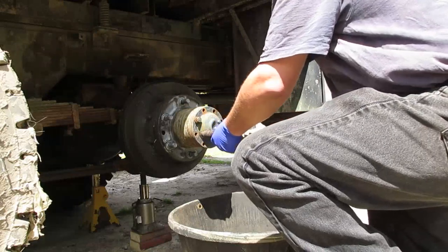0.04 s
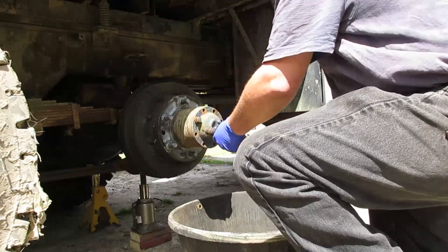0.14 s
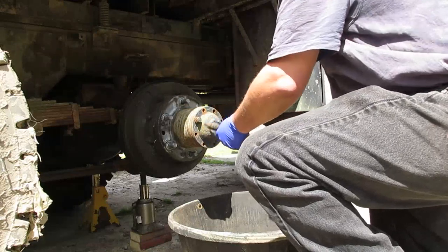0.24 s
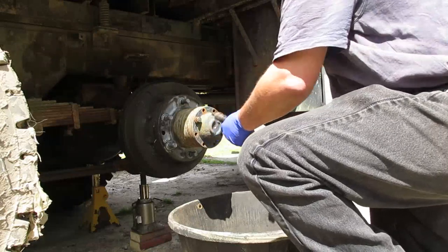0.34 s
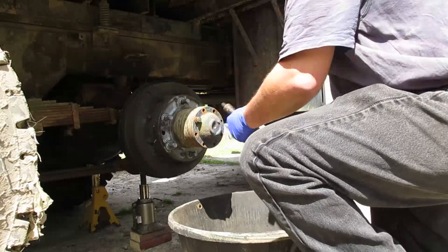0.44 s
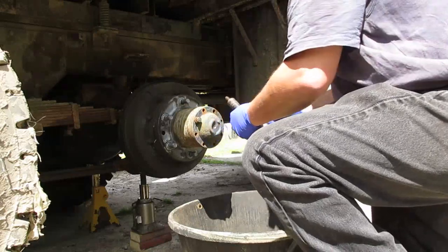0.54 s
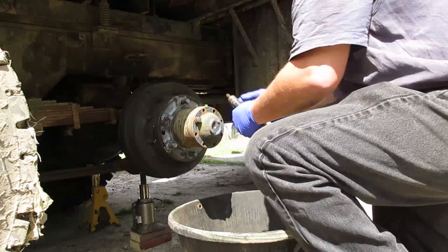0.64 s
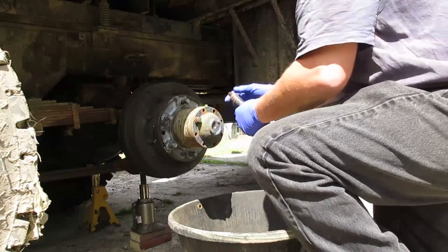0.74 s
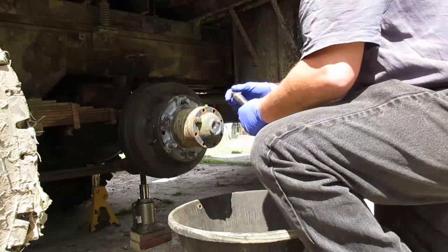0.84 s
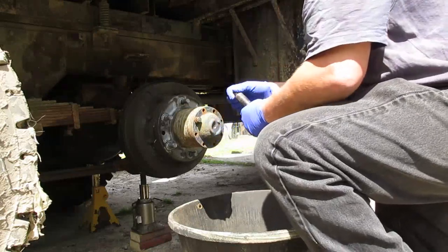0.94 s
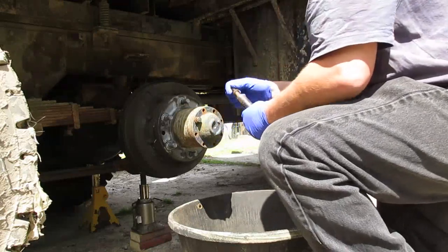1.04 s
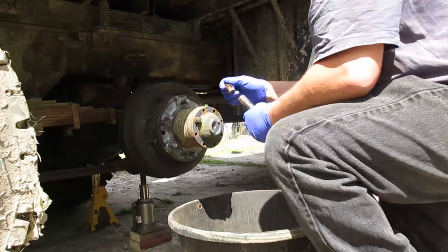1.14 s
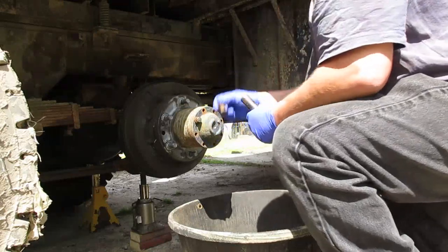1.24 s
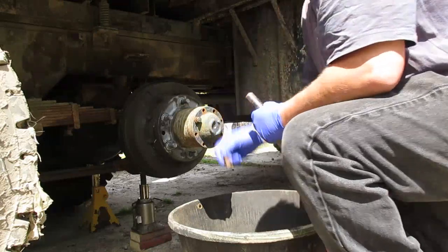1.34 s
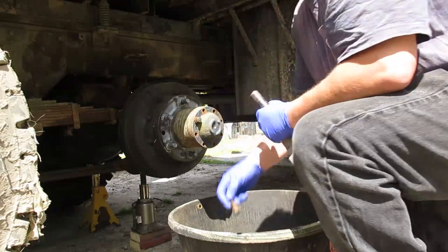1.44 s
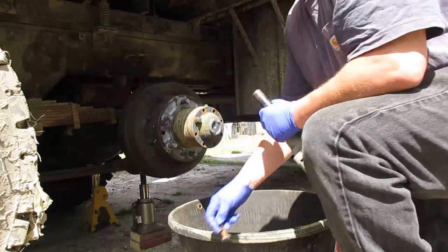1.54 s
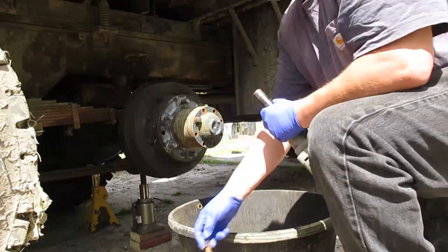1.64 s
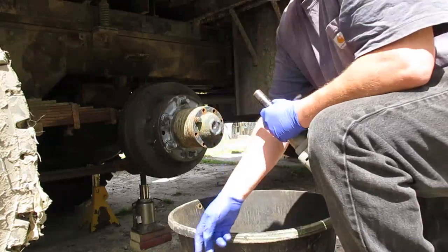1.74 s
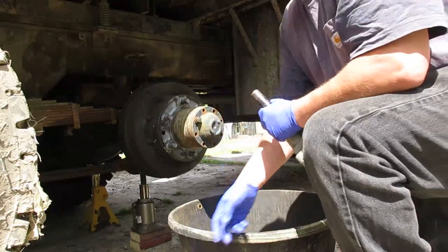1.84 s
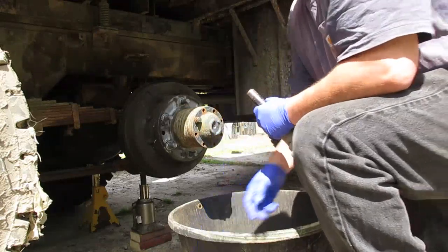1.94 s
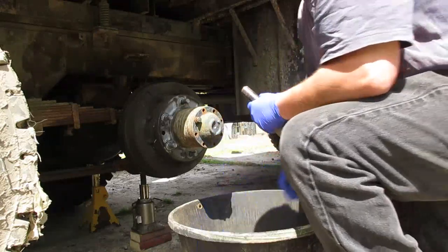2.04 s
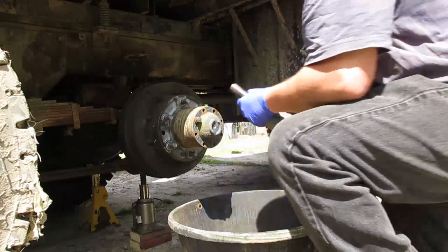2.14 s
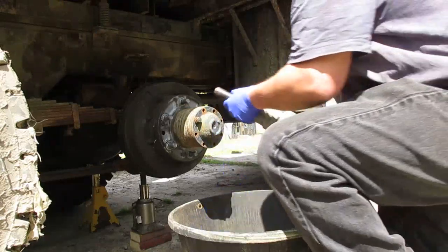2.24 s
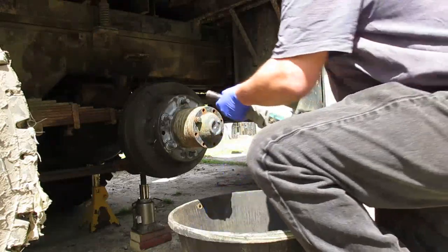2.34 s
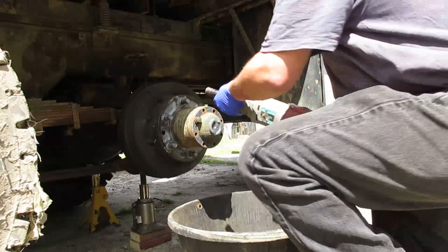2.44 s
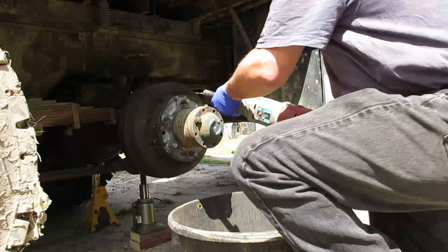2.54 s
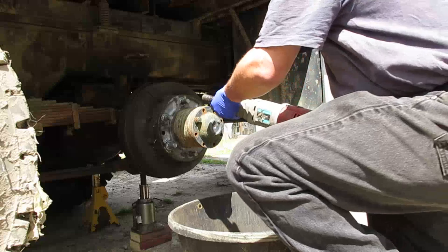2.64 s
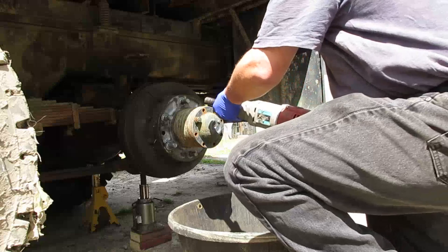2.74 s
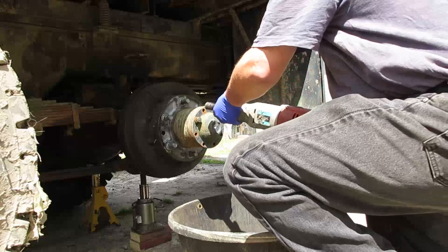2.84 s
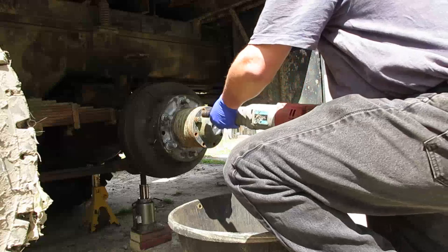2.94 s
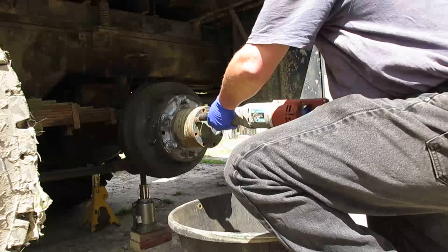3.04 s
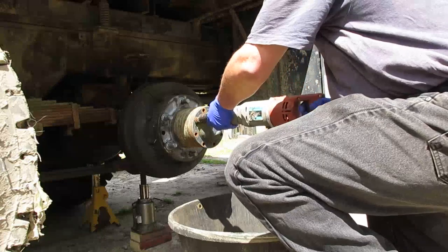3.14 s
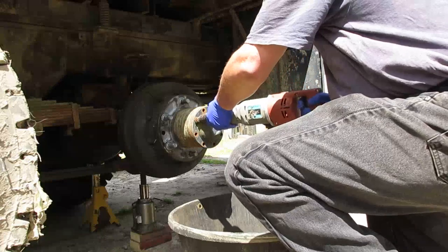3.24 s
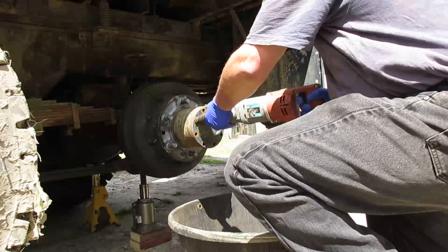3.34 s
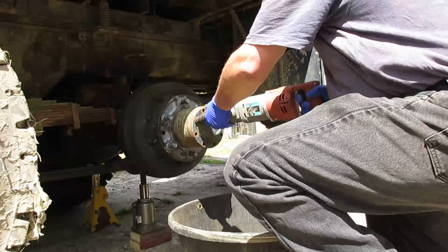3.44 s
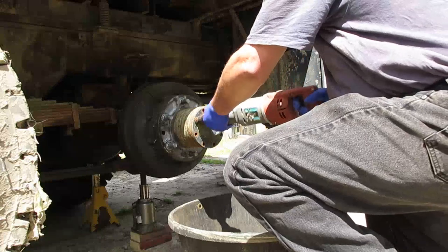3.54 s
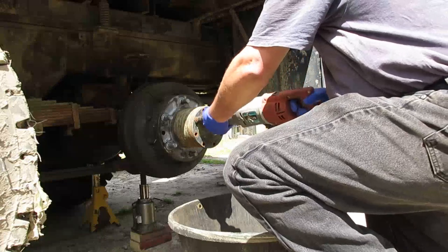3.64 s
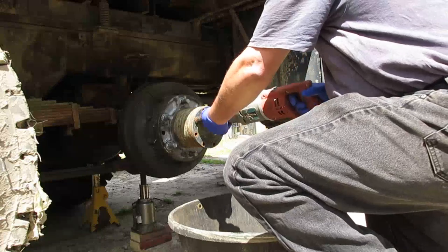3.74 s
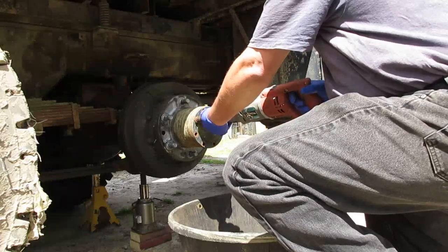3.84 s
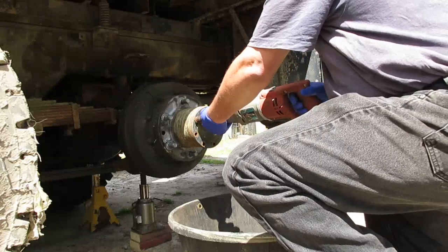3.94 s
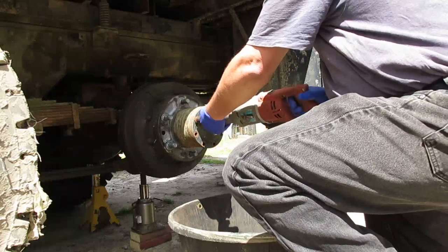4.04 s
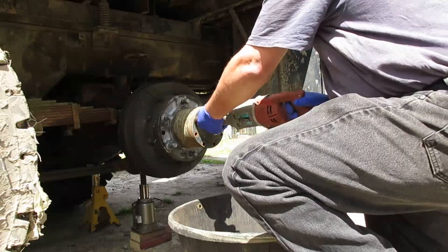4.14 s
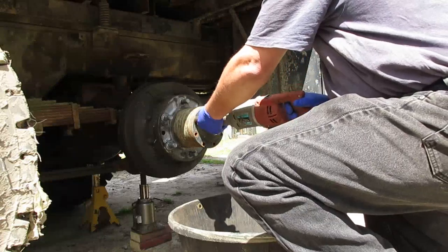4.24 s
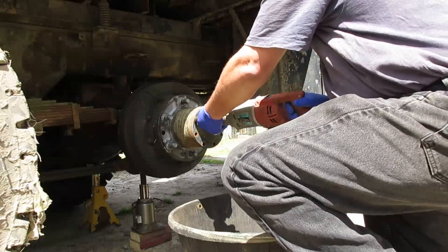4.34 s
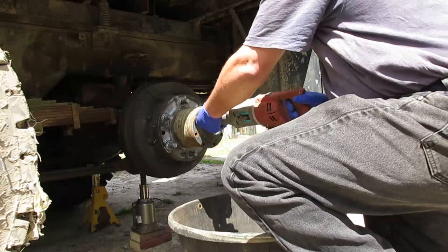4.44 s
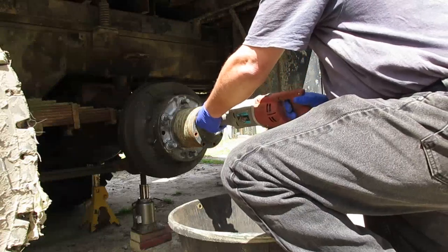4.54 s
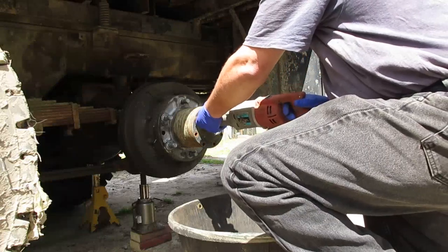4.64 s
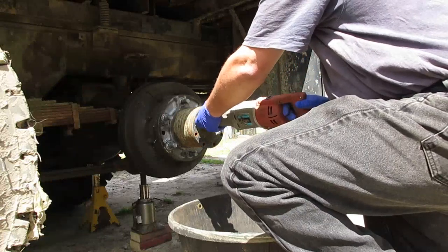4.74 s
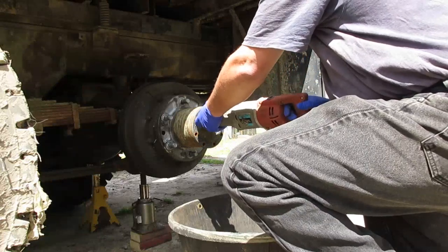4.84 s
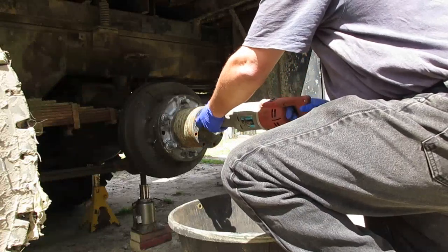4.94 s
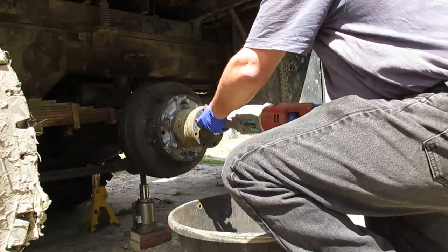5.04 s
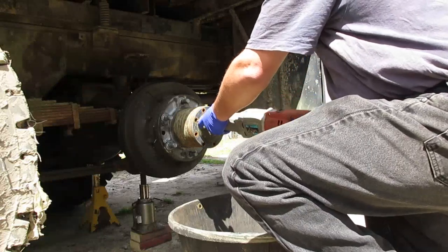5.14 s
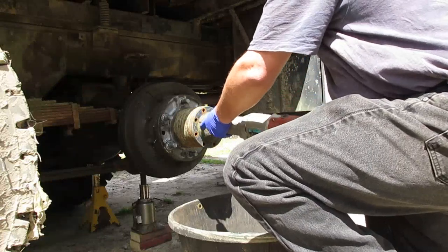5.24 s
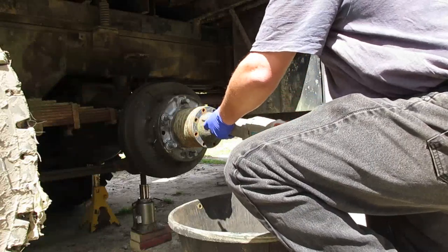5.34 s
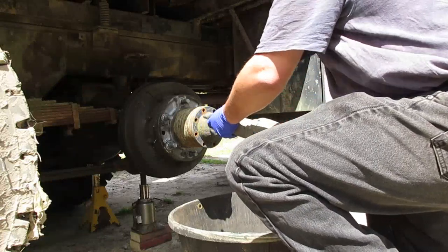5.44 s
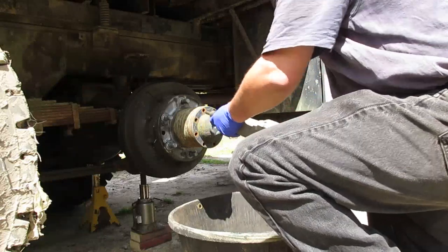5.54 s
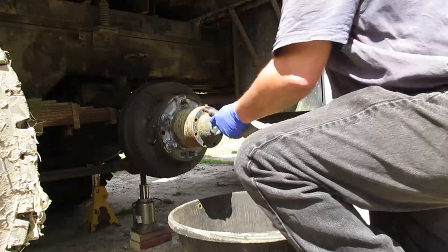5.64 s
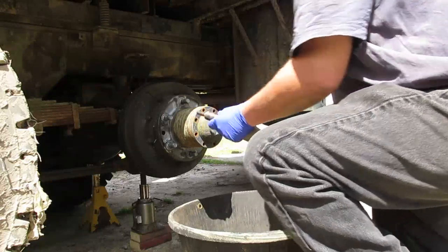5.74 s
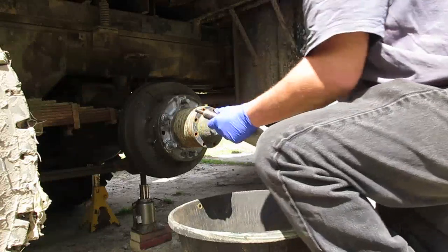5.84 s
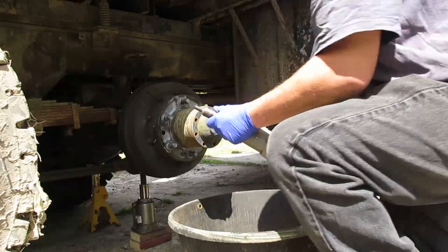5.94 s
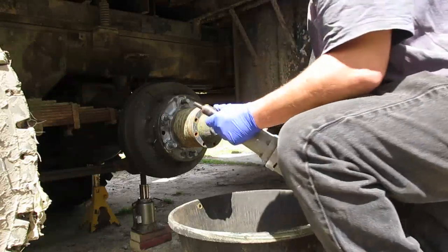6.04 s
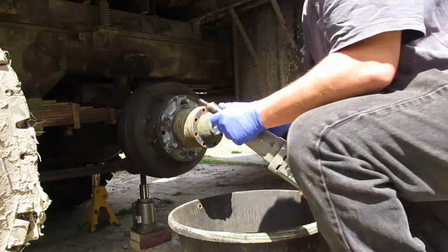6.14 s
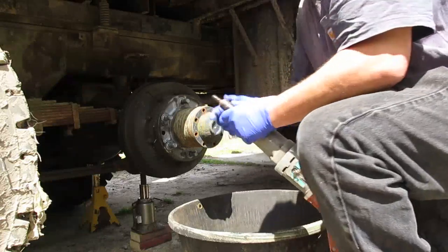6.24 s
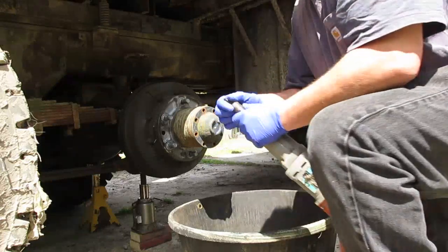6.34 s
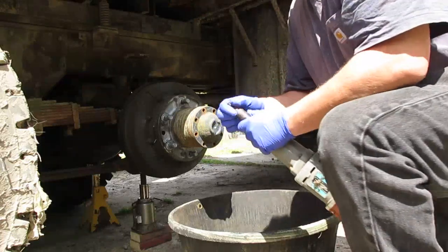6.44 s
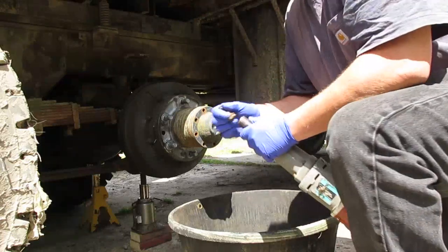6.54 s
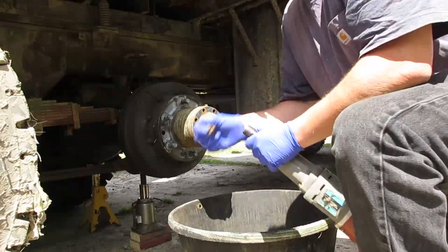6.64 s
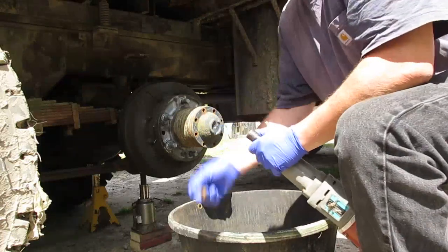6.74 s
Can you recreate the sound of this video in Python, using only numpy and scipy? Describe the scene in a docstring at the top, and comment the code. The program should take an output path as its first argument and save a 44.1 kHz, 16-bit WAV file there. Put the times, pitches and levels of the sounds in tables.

```python
"""Impact wrench at a truck hub

An electric impact wrench under an open shed coasts down, later spins up and coasts again: gear teeth
rattle the case, mesh tones glide through its resonances. Around the bursts the socket knocks on studs,
a nut drops and clinks, clothes rustle. Birds call outside; light wind stirs over the hum of the yard."""
import sys
import numpy as np
from scipy import signal
from scipy.io import wavfile
from scipy.ndimage import uniform_filter1d

SR = 44100
rng = np.random.default_rng(int(sys.argv[2]) if len(sys.argv) > 2 else 0)


def digitize_waveform(pressure):
    """Quantize a signal to 16-bit integers and store it at the path in sys.argv[1].

    Rows of a 2-D input are taken as channels; values are limited to [-1, 1].
    """
    field = np.atleast_2d(pressure).T
    bounded = np.clip(field, -1, 1)
    quanta = np.round(bounded * 32767).astype(np.int16)
    wavfile.write(sys.argv[1], SR, quanta)


N = 298998
T = np.arange(N) / SR

# background envelopes: (time [s], yard hum [dB], wind [dB])
BACKGROUND = [(0, -56, -66), (1.0, -59, -58), (2.0, -55, -53.5), (2.4, -52.5, -49), (4.3, -49.5, -45.5),
              (4.6, -54, -55), (5.6, -50, -54.5), (5.8, -49, -47), (6.55, -51, -44), (6.78, -46, -45)]


def amp(db):
    return 10 ** (np.asarray(db) / 20)


def unit_rms(x):
    return x / np.sqrt(np.mean(x ** 2) + 1e-20)


def colour(x, points):
    """Causal filter following (frequency [Hz], gain [dB]) points."""
    f, db = np.transpose(points)
    hz = abs(np.fft.fftfreq(8192, 1 / SR))
    log_gain = np.log(amp(np.interp(np.log(hz + 1), np.log(f + 1), db)))
    taps = np.fft.ifft(np.exp(np.conj(signal.hilbert(log_gain)))).real[:4096]
    return signal.oaconvolve(x, taps)[:len(x)]


def band(x, lo_hz, hi_hz):
    sos = signal.butter(2, [lo_hz, min(hi_hz, .45 * SR)], "band", fs=SR, output="sos")
    return signal.sosfilt(sos, x)


def lift(x, db, lo_hz, hi_hz):
    """Zero-phase boost or cut of one band."""
    return x + (amp(db) - 1) * band(band(x, lo_hz, hi_hz)[::-1], lo_hz, hi_hz)[::-1]


def ring(x, hz, width_hz):
    """Resonance with steep skirts, rms 1."""
    pole = np.exp((2j * hz - width_hz) * np.pi / SR)
    return unit_rms(signal.lfilter([1], np.convolve([1, -pole], [1, -pole]), x).real)


def drift(n, rate_hz):
    """Smooth random curve, rms 1."""
    span = max(int(SR / rate_hz / 2), 2)
    return unit_rms(uniform_filter1d(uniform_filter1d(rng.standard_normal(n), span), span))


def add(mix, start_s, sound):
    part = mix[round(start_s * SR):][:len(sound)]
    part += sound[:len(part)]


def echoes(x, t60_s):
    """Sparse decaying reflections of random sign."""
    at = np.arange(200, SR, 20)
    taps = np.zeros(SR + 20)
    taps[at + rng.integers(0, 20, len(at))] = rng.choice([-1., 1.], len(at)) * amp(-60 * at / SR / t60_s)
    return signal.oaconvolve(band(x, 160, 8500), taps / np.linalg.norm(taps))[:N]


def yard_hum():
    """Low, slightly wavering noise of the yard."""
    # hum spectrum: (frequency [Hz], gain [dB])
    spectrum = [(88, -31.5), (150, -5), (334, -10), (439, -13.5), (624, -7), (1260, -8.5), (1360, -6),
                (1940, -12.5), (2360, -16), (10200, -30), (14500, -44), (16000, -61)]
    times_s, hum_db, _ = np.transpose(BACKGROUND)
    hum = colour(rng.standard_normal(N), spectrum)
    return hum * amp(np.interp(T, times_s, hum_db) + .8 * drift(N, 12)) / np.std(band(hum, 600, 2000))


def wind():
    """Lumpy rumble of light wind."""
    # wind spectrum: (frequency [Hz], gain [dB])
    spectrum = [(12, -53), (20, -20), (81, 2.5), (118, -3.5), (166, -1.5), (300, -7), (382, -11.5),
                (500, -8.5), (650, -44), (1100, -120)]
    times_s, _, wind_db = np.transpose(BACKGROUND)
    rumble = unit_rms(colour(rng.standard_normal(N), spectrum))
    return rumble * amp(np.interp(T, times_s, wind_db) - 2.5 + 2.36 * drift(N, 23))


def cloth():
    """Grainy rustle swelling above a faint floor."""
    # rustle spectrum: (frequency [Hz], gain [dB])
    spectrum = [(1500, -48), (3000, 4), (5000, -3), (9000, -5.5), (12000, -12), (15500, -14.5)]
    # cloth swells: (centre [s], half-width [s], level [dB])
    swells = [(2.3, 0.17, -58.5), (2.85, .07, -57), (6.3, 0.33, -58), (6.43, 0.027, -56), (6.78, .14, -50)]
    envelope = amp(-64) + sum(amp(db - 8.1 * ((T - at_s) / half_s) ** 2) for at_s, half_s, db in swells)
    grains = rng.standard_normal(N) * amp(1.4 * drift(N, 17) + 3.2 * drift(N, 400))
    return unit_rms(colour(grains, spectrum)) * envelope


def glide(start_s, length_s, first_hz, last_hz, db, bend):
    """Bird note contour: slide, then hold, under a level arch. Bend > 1 slides late."""
    progress = np.arange(0, length_s, 1 / SR) / length_s
    slide = np.minimum(progress / .82, 1) ** bend
    return start_s, (first_hz + (last_hz - first_hz) * slide, db - 7 * (2 * progress - 1) ** 2)


def contour(rows):
    """Start time and per-sample columns of a breakpoint table."""
    times_s, *columns = np.transpose(rows)
    t = np.arange(times_s[0], times_s[-1], 1 / SR)
    return times_s[0], [np.interp(t, times_s, column) for column in columns]


def birds():
    """Wavering whistles, chirps fluttered into a rasp, a nasal call of five partials."""
    # whistles: (start [s], length [s], nominal first pitch [Hz], nominal last pitch [Hz], level [dB])
    whistles = [(1.089, 0.27, 2020, 3170, -55.5), (1.39, 0.12, 1950, 1900, -59),
                (1.63, 0.096, 1930, 1950, -57), (1.729, 0.24, 2006, 3130, -54),
                (2.05, .09, 1950, 1900, -56)]
    # raspy notes: (start [s], length [s], first pitch [Hz], last pitch [Hz], level [dB])
    chirps = [(1.0, .08, 2580, 4000, -61), (2.98, 0.093, 3500, 3280, -57.5), (3.56, .11, 3190, 4040, -52),
              (3.6, .1, 2890, 2850, -54), (3.88, .12, 2810, 2920, -48), (3.92, 0.12, 2426, 2400, -43.5),
              (4.08, .11, 3070, 4300, -51), (4.13, 0.13, 3600, 3350, -44.5),
              (6.05, 0.09, 2096, 2220, -45.5)]
    # long call and its lower ending, one list each: (time [s], pitch [Hz], level [dB])
    calls = [
        [(5.9, 1350, -46), (5.99, 1374, -38.5), (6.09, 1348, -48), (6.19, 1400, -38.5), (6.29, 1388, -37.5),
         (6.38, 1316, -38)],
        [(6.36, 1071, -43), (6.45, 952, -49)],
    ]
    # call harmonics: (multiple of pitch, level [dB])
    harmonics = [(1, -10), (2, 0), (3, -12), (4, -15), (5, -24)]
    notes = [(glide(*row, bend=2.1), [(.98, 0)], .014, 120) for row in whistles]  # one pure tone
    notes += [(glide(*row, bend=.55), [(1, 0)], .04, 300) for row in chirps]
    notes += [(contour(rows), harmonics, .006, 80) for rows in calls]
    out = np.zeros(N)
    for (start_s, (hz, level_db)), partials, waver, flutter_hz in notes:
        n = len(hz)
        phase = 2 * np.pi * np.cumsum(hz * (1 + waver * drift(n, flutter_hz))) / SR
        note = sum(amp(db + 3.2 * drift(n, flutter_hz)) * np.sin(k * phase) for k, db in partials)
        add(out, start_s, amp(level_db) * note * signal.windows.tukey(n, .2))
    return out


def struck(modes, blows):
    """Each blow rings the modes of one steel part."""
    out, t = np.zeros(N), np.arange(SR // 3) / SR
    for at_s, *levels_db in blows:
        for db, (hz, t60_s) in zip(levels_db, modes):
            add(out, at_s, amp(db - 60 * t / t60_s) * np.sin(2 * np.pi * hz * t))
    return out


def clinks():
    """The dropped nut and the socket ring."""
    # nut modes, the close pair beats: (frequency [Hz], t60 [s])
    nut_modes = [(11950, 0.12), (14800, .1), (11975, 0.099)]
    # nut impacts: (time [s], level of each mode [dB])
    nut_blows = [(1.881, -50, -27, -50), (1.911, -26.5, -34, -41)]
    # socket modes: (frequency [Hz], t60 [s])
    socket_modes = [(5405, 0.1), (5798, 0.11), (12510, 0.068), (14370, 0.076)]
    # socket impacts: (time [s], level of each mode [dB])
    socket_blows = [(6.446, -48, -50, -70, -52), (6.557, -44, -45, -45, -38), (6.569, -58, -63.5, -54, -32)]
    return struck(nut_modes, nut_blows) + struck(socket_modes, socket_blows)


def knock(db, treble_db):
    """Steel on steel: a crack and a noisy ring. Harder knocks start and die faster."""
    # impact spectrum: (frequency [Hz], gain [dB])
    spectrum = [(300, 2), (1500, 6.5), (3300, 9.5), (6000, 5.5), (11000, -4.5), (15500, -11)]
    t = np.arange(SR // 5) / SR
    noise = rng.standard_normal(len(t))
    steel = unit_rms(unit_rms(colour(noise, spectrum)) + .33 * ring(noise, hz=3030, width_hz=1300))
    rise_s = .0004 * amp(-.7 * (db + 10))
    crack_t60_s, ring_t60_s = .0064, .083 * amp(-.25 * (db + 21))
    decay = amp(-60 * t / crack_t60_s) + .64 * amp(-60 * t / ring_t60_s)
    return amp(db - 12) * lift(steel, treble_db, 3600, 21000) * (1 - np.exp(-t / rise_s)) * decay


def handling():
    """Socket knocks on the studs; dull thuds of falling pitch."""
    # steel knocks: (time [s], strength [dB], treble lift [dB])
    knocks = [(1.707, -34.5, 5), (1.8807, -7.5, 6.5), (1.908, -9, -0.5), (1.916, -17.5, 5),
              (2.1713, -36, 9), (2.2994, -20.5, -8), (2.513, -29.5, -5), (2.61, -26.5, -4),
              (2.6297, -30.5, 5), (2.668, -27.5, 6), (2.7703, -34, 6.5), (3.1078, -31, -3),
              (3.2243, -12, -11), (3.3064, -24, -15), (3.333, -20.5, -18), (3.357, -7.5, -21.5),
              (3.6531, -19, 1), (3.778, -25, -16), (3.82, -20.5, -9), (3.925, -30, 5), (4.1631, -24, 8),
              (4.1857, -6.5, -9.5), (4.2961, -35, 4), (6.419, -23.5, -2), (6.4344, -25, -7),
              (6.555, -33, 0), (6.6376, -27, -4)]
    # thuds: (time [s], level [dB], initial pitch [Hz])
    thuds = [(1.882, -28.5, 297), (2.441, -24, 262), (3.008, -35, 163), (3.223, -30, 154),
             (3.355, -27, 210), (4.191, -22, 169), (6.434, -32, 680)]
    thud_rise_s, thud_t60_s = .0026, .067
    out, t = np.zeros(N), np.arange(SR // 4) / SR
    for at_s, db, treble_db in knocks:
        add(out, at_s, knock(db, treble_db))
    for at_s, db, hz in thuds:
        envelope = amp(db - 60 * t / thud_t60_s) * (1 - np.exp(-t / thud_rise_s))
        add(out, at_s, envelope * np.sin(2 * np.pi * hz * t * (1 - 2 * t)))
    return out


def motor(on_s, release_s, stop_s, base_db, run_out_s, lift_db):
    """Spin-up, then coasting against drag and friction: sets mesh rate, clatter level and treble."""
    free_hz, spin_up_s, drag_per_s, friction_hz = 1525, .114, .73, 400
    slack_s, bite_s, tail_s = .015, .018, .066
    t = np.arange(max(on_s + slack_s, 0), stop_s + tail_s, 1 / SR)
    powered_s, coasted_s = np.minimum(t, release_s) - on_s, np.maximum(t - release_s, 0)
    meshed_s, left_s = t - on_s - slack_s, np.maximum(stop_s - t, 0)
    load = np.exp(-powered_s / spin_up_s)
    mesh_hz = (free_hz * (1 - load) + friction_hz) * np.exp(-drag_per_s * coasted_s) - friction_hz
    pull_db = (2.5 + 8.5 * load) * np.exp(-coasted_s / .0046)  # louder under power, most while slow
    coast_db = 1.89 * np.log2(mesh_hz / 1000) * (coasted_s > 0)
    onset_db = -20 * np.exp(-meshed_s / bite_s)
    ending_db = -14 * np.exp(-left_s / run_out_s) - 35 * np.maximum(t - stop_s, 0) / tail_s
    treble_db = lift_db - 7.5 * np.exp(-meshed_s / .11) - 18 * np.exp(-left_s / .17)  # dull at both ends
    return t[0], mesh_hz, base_db + pull_db + coast_db + onset_db + ending_db, treble_db


def gear_clatter(mesh_hz, treble_db, boom_db):
    """Teeth rattle in their slack and ring the case, small parts and the loose socket."""
    # clatter spectrum: (frequency [Hz], gain [dB])
    spectrum = [(200, -59.5), (450, -19), (700, -17), (1100, -5), (1700, -7), (2600, 0), (4500, -1.5),
                (6500, -4.5), (9000, -6), (11500, -13.5), (12500, -18.5), (15500, -26.5)]
    # case modes: (frequency [Hz], width [Hz], level [dB])
    case_modes = [(903, 215, -2), (1315, 47, -13.5), (1948, 50, -19), (2820, 390, -3.5), (3140, 390, -5),
                  (5620, 700, -10), (6110, 770, -4), (7550, 1100, -8.5), (8530, 140, -12)]
    # housing modes that wake at low speed: (frequency [Hz], width [Hz], level at 400 teeth/s [dB])
    groan_modes = [(658.3, 41, -15.5), (1010, 64, -20)]
    # loose socket resonance: (frequency [Hz], width [Hz], level [dB])
    socket_mode = (6650, 330, -9)
    n = len(mesh_hz)
    hits = rng.random(n) < 1.5 * mesh_hz / SR
    taps = hits * amp(3.1 * np.minimum(rng.exponential(1, n), 4)) * rng.choice([-1, 1], n)
    drive = unit_rms(unit_rms(taps) + 1.84 * rng.standard_normal(n)) * amp(1.05 * drift(n, 64))

    def mode(hz, width_hz, db, waver_db, rate_hz):
        return amp(db + waver_db * drift(n, rate_hz)) * ring(drive, hz, width_hz)

    case = sum(mode(*row, waver_db=2.5, rate_hz=25) for row in case_modes)
    parts = unit_rms(sum(mode(hz, 190, 0, waver_db=5, rate_hz=12) for hz in rng.uniform(1800, 11000, 60)))
    slow_db = 16.7 * np.log2(400 / np.maximum(mesh_hz, 260))
    groan = amp(slow_db) * sum(mode(*row, waver_db=1.8, rate_hz=15) for row in groan_modes)
    socket = amp(3.34 * treble_db) * mode(*socket_mode, waver_db=2, rate_hz=23)
    rattle = unit_rms(colour(drive + .28 * parts, spectrum)) + .3 * case
    rattle /= np.std(band(rattle, 1800, 5000))
    rattle = lift(rattle, boom_db, 200, 1700)
    return lift(rattle, treble_db, 5300, 19000) + groan + socket


def gear_whine(mesh_hz, mesh_phase):
    """Mesh tones glide through housing resonances; teeth strike harder at speed and under power."""
    # housing radiation: (frequency [Hz], gain [dB])
    radiation = [(380, -58), (470, -38), (700, -34), (900, -21), (1060, -34), (1180, -37), (1290, -23),
                 (1450, -31), (1750, -30), (2100, -35), (2600, -25), (3500, -45)]
    # mesh tones: (multiple of mesh rate, level [dB])
    orders = [(1, 0), (1.34, -11), (2, -3)]
    n = len(mesh_hz)
    pulling = uniform_filter1d(1. * (np.gradient(mesh_hz) > 0), 2000)
    force_db = 8 * np.log2(mesh_hz / 1000) + 1.2 * pulling
    housing_hz, housing_db = np.transpose(radiation)
    tones = np.zeros(n)
    for k, order_db in orders:
        radiated_db = np.interp(np.log(k * mesh_hz), np.log(housing_hz), housing_db)
        tones += amp(order_db + radiated_db + 3.5 * drift(n, 24)) * np.sin(k * mesh_phase)
    fade_in = np.minimum(np.arange(n) / (.0072 * SR), 1)
    fade_out = np.minimum((n - np.arange(n)) / (.15 * SR), 1)
    return amp(force_db) * tones * fade_in * fade_out


def impact_wrench():
    """Clatter and whine of each trigger pull; knocks as the gear slack is taken up."""
    # trigger pulls, the first already coasting at 0 s: (on [s], release [s], standstill [s],
    # clatter [dB], run-out [s], treble lift [dB], housing boom [dB], whine [dB])
    pulls = [(-.863, -0.58, .88, -29, .16, 2, -0.8, -4), (4.39, 4.62, 5.935, -22.5, 0.054, 2, 0.45, 1.5)]
    # slack take-up knocks: (time [s], strength [dB])
    take_up = [(4.405, -10.5), (4.4121, -6), (4.426, -2), (4.4542, -5)]
    teeth = 27
    out = np.zeros(N)
    for *pull, boom_db, whine_db in pulls:
        start_s, mesh_hz, clatter_db, treble_db = motor(*pull)
        clatter = gear_clatter(mesh_hz, treble_db, boom_db)
        mesh_phase = 2 * np.pi * np.cumsum(mesh_hz * (1 + .0032 * drift(len(mesh_hz), 76))) / SR
        throb_db = .75 * np.sin(mesh_phase / teeth)  # once per gear turn
        whine = gear_whine(mesh_hz, mesh_phase)
        add(out, start_s, amp(clatter_db + throb_db) * clatter + amp(whine_db) * whine)
    for at_s, db in take_up:
        add(out, at_s, knock(db, treble_db=8))
    return out


def scene():
    """Mono mix of near work, far birds and background."""
    near, far = impact_wrench() + handling() + clinks(), birds()
    near += amp(-15.5) * echoes(near, t60_s=.16)  # truck and shed walls
    far += amp(-4) * echoes(far, t60_s=.68)  # trees and buildings
    return (near + far + yard_hum() + wind() + cloth())[None]


def record(dry):
    """Soft clip, then a steep low-pass."""
    ceiling, cutoff_hz = 1.1, 15150
    rounded = ceiling * np.tanh(dry / ceiling)
    low_pass = signal.firwin(401, cutoff_hz, window=("kaiser", 9), fs=SR)
    return signal.oaconvolve(rounded, low_pass[None], "same")


dry = scene()
out = record(dry)
digitize_waveform(out)
```